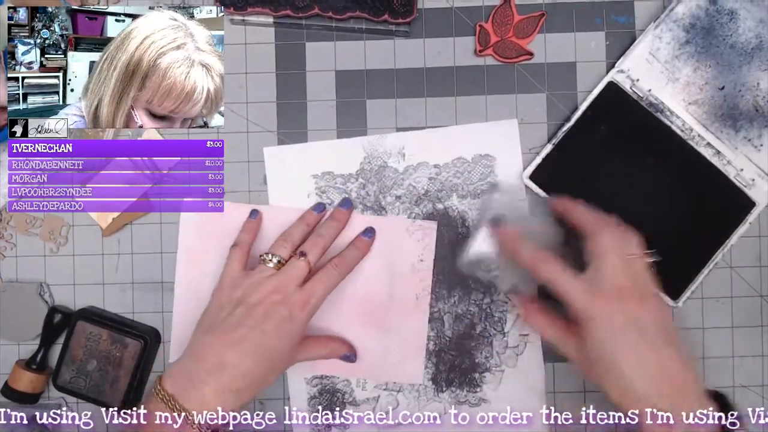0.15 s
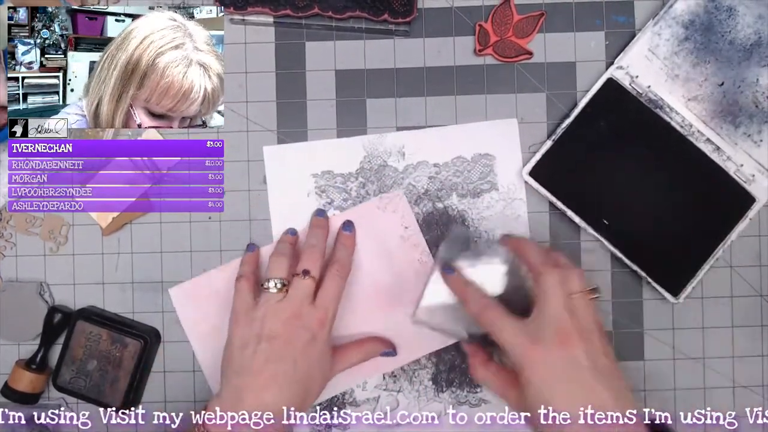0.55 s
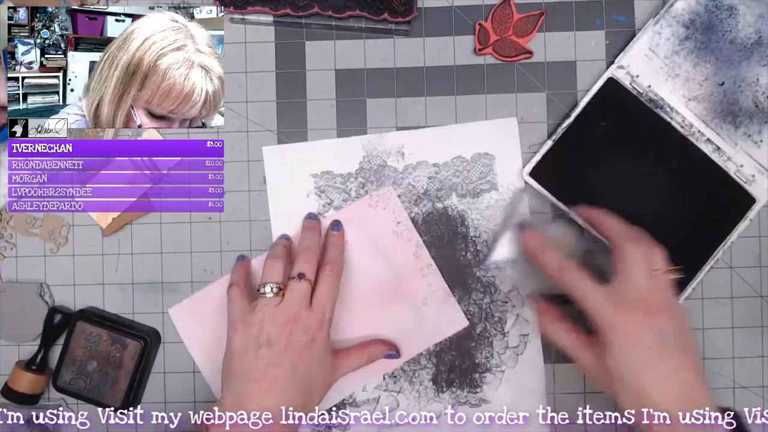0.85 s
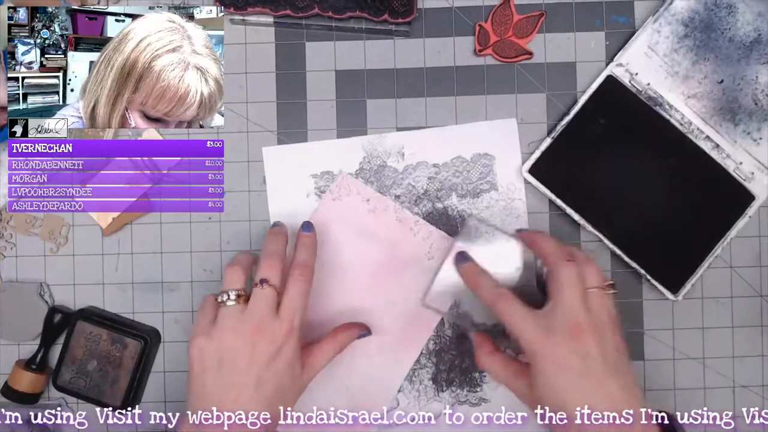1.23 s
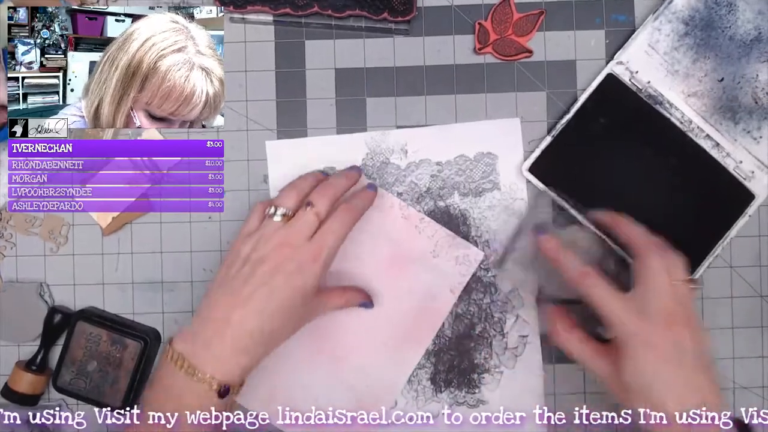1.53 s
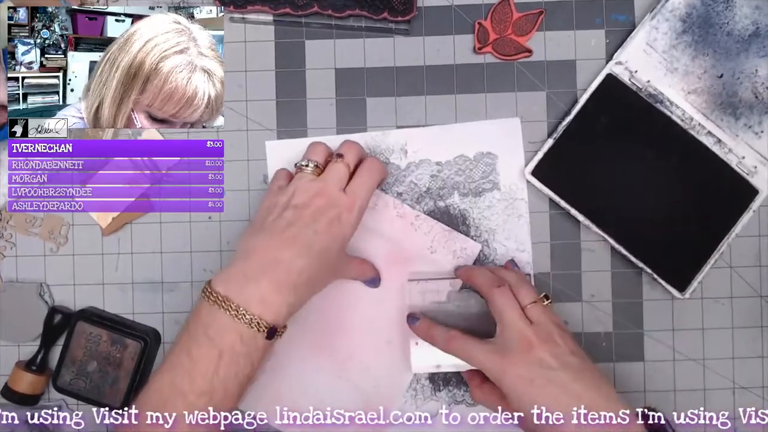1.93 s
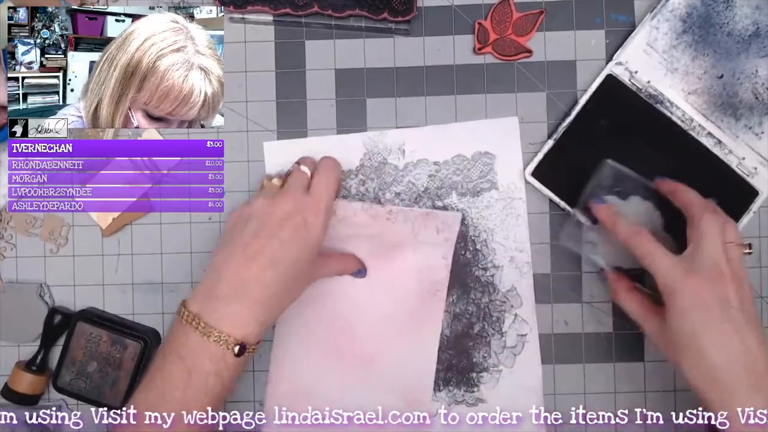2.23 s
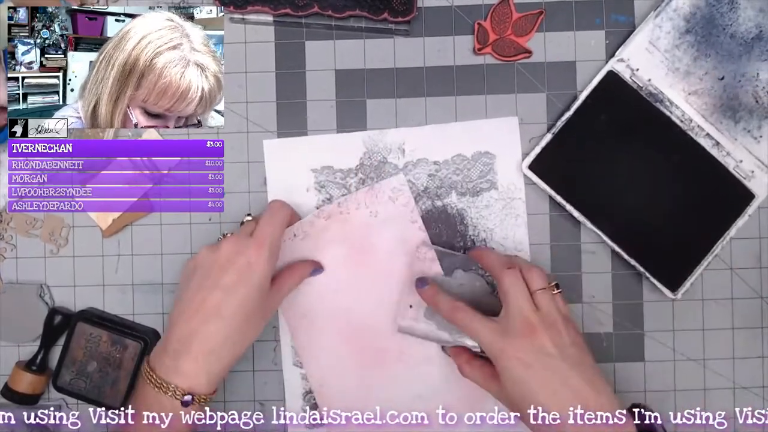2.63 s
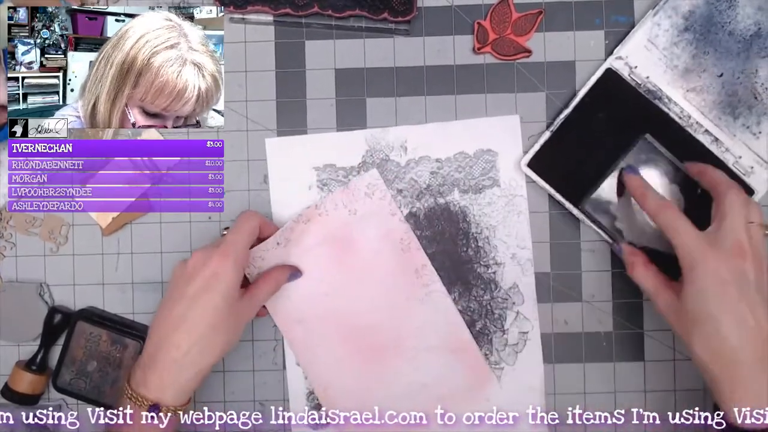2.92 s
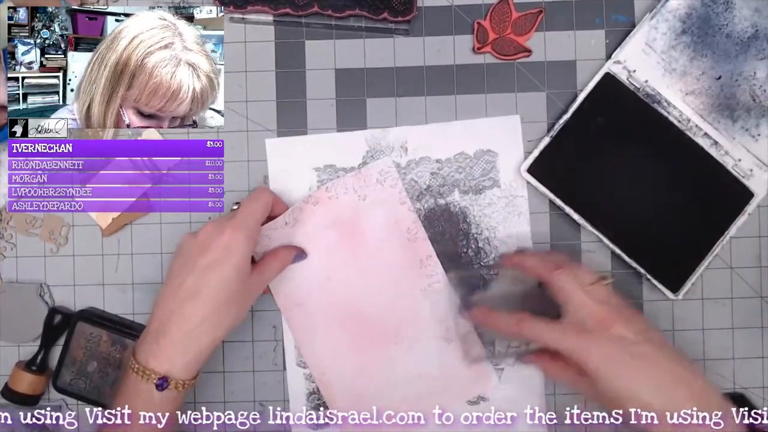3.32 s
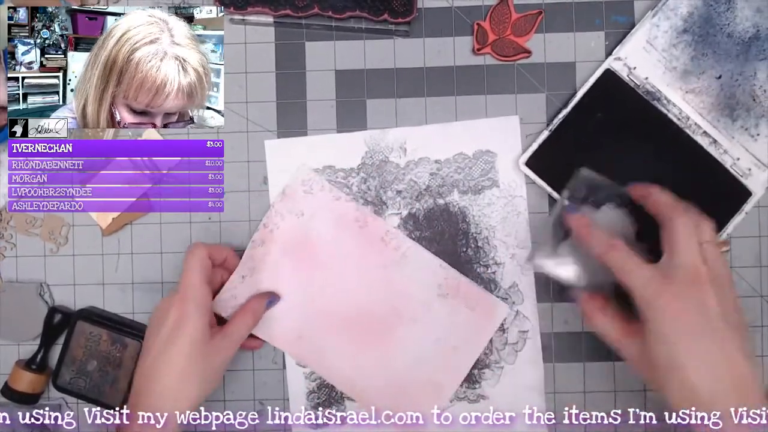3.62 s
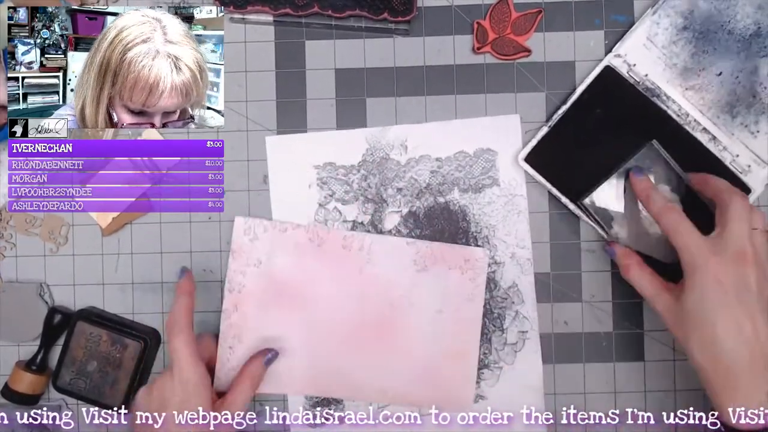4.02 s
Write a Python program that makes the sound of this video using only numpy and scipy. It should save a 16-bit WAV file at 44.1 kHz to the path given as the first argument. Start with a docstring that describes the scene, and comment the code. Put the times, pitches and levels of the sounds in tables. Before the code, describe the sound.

Quick, even clacks and thumps of a rubber stamp being inked and pressed onto paper, with soft paper hiss between them.

```python
"""Rubber stamp, ink pad and paper

A rubber stamp on an acrylic block goes back and forth between an ink pad and paper on a desk. Each impact
excites damped modes: the pad's plastic case clacks, the block clicks and the desk thumps. Tacky ink
crackles as its threads part, and friction makes the sheet hiss as it is slid round between blows.
The room is small and fairly dry."""
import sys
import numpy as np
from scipy import signal
from scipy.io import wavfile
from scipy.ndimage import uniform_filter1d

SR = 44100
rng = np.random.default_rng(int(sys.argv[2]) if len(sys.argv) > 2 else 0)


def unload_wav(signal):
    """Save mono or channel-first audio to the path in sys.argv[1] as 16-bit WAV at rate SR, clipped to [-1, 1]."""
    wavfile.write(
        sys.argv[1],
        SR,
        np.round(np.clip(np.atleast_2d(signal).T, -1, 1) * 32767).astype(np.int16),
    )


N = 183632
T = np.arange(SR * 3 // 5) / SR  # time axis of one impulse response, t/s

# blows on the pad: t/s, then level/dB of case, desk, click, block, after-knock
PAD_BLOWS = [(0.1712, -16, -27.5, -25.5, -32, -37), (0.8807, -19, -45, -27, -34.5, -71.5),
             (1.5637, -18.5, -25, -27, -30, -48.5), (2.1842, -19.5, -28, -25.5, -33.5, -62),
             (2.7919, -18.5, -31.5, -27, -37.5, -60), (3.3800, -17, -22.5, -26.5, -43, -48),
             (3.9371, -21, -29.5, -28, -41.5, -72)]
# blows on the paper: t/s, clatter/dB, desk/dB, desk tilt/(dB/octave), click/dB, block/dB,
# block tilt/(dB/octave), delay until flat/s, skid/dB, after-knock/dB, scrape/dB
PAPER_BLOWS = [(0.5495, -25.5, -19, 3, -30.5, -32, -1, 0.0037, -46.5, -37, -60.5),
               (1.224, -51, -24, 0.5, -27.5, -34.5, -1.5, .002, -40, -38, -54.5),
               (1.865, -28, -23.5, -0.5, -25.5, -32.5, -13.5, 0.009, -54, -37.5, -56),
               (2.4696, -21, -19, 1, -24.5, -27, -2.5, 0.0071, -34.5, -36, -47),
               (3.0739, -21, -17, 1.5, -23.5, -28, -2.5, 0.0087, -35, -32.5, -47.5),
               (3.667, -23.5, -18, 3.5, -24, -29.5, -2.5, 0.0079, -45, -45, -48.5)]
# peeling off the pad: t/s, first snap's ring/dB, its crack/dB, first gap/s, crackle/dB, crackle length/s
INK_PEELS = [(0.2492, -40.5, -43.5, .044, -50.5, .135), (0.9452, -44, -45, 0.032, -48.5, 0.058),
             (1.6403, -38.5, -41.5, .039, -51.5, 0.091), (2.2511, -40.5, -44.5, 0.024, -48.5, 0.065),
             (2.8654, -40.5, -44, 0.028, -50.5, 0.097), (3.4608, -40.5, -43.5, 0.059, -46, 0.15),
             (3.9990, -45.5, -52, 0.045, -53.5, .1)]
# slides of the sheet: t/s, length/s, level/dB, swell/(dB/s)
SHEET_SLIDES = [(-0.02, 0.069, -64.5, -1), (0.107, .31, -61, -17), (0.218, 0.092, -52.5, 9.5),
                (0.685, 0.0095, -50.5, 0), (0.761, 0.18, -54, 25), (0.887, 0.091, -45, -67),
                (1.348, 0.027, -51.5, -1), (1.581, 0.13, -55, 5), (1.941, 0.22, -54, 27),
                (2.151, 0.18, -42.5, -31), (2.52, 0.2, -50.5, -27), (2.821, 0.14, -50.5, -36),
                (3.202, 0.34, -52.5, 12.5), (3.773, 0.07, -50.5, -2), (3.969, 0.072, -53, -140)]
# flicks of the sheet: t/s, level/dB
SHEET_FLICKS = [(2.166, -35), (2.615, -44.5), (3.255, -54), (3.773, -47.5)]

# normal modes: f/Hz, relative level/dB, t60/s
DESK_MODES = [(118, -12, 0.017), (143, -7, 0.15), (243, -1, 0.062), (273.6, 1.5, 0.042), (291, 3.5, 0.073),
              (379, -7, 0.12), (480, -25, 0.047), (491.5, 0.5, .07), (529, 0.5, 0.097), (627, -14, 0.043),
              (704, -12.5, 0.14), (842.3, 0, 0.059)]
CASE_MODES = [(352, -18, 0.05), (433, -12.5, 0.07), (431, -12, .045), (565, -8.5, 0.067), (590, -3, 0.035),
              (697, -23.5, .04), (835.5, 2.5, 0.03), (875, 6, .05), (1053, -0.5, 0.029), (1121, 3.5, 0.038),
              (1207, -18.5, 0.09), (1560, -15.5, .02), (5638, -15.5, 0.041), (7470, -19, 0.012)]
BLOCK_MODES = [(2060, -4.5, 0.042), (2170, -9.5, 0.036), (2827, -3, 0.045), (3407, -3.5, 0.034),
               (3718, -4.5, 0.047), (3950, -6, 0.052), (4930, 3, 0.036), (5260, 2, 0.045),
               (5530, -5, 0.048), (6993, -1, 0.025), (8280, -15, 0.054)]
INK_MODES = [(930, -4, .032), (1050, -1, .032), (1135, 0, .032), (1225, -5, .03), (2030, -19, .016),
             (4200, -14, .012)]
DESK_HUM_MODE = [(980, 0, 0.3)]
LOW_HUM_MODE = [(214, 0, .3)]

# source spectra: f/Hz, relative level/dB
HUSH_SPECTRUM = [(25, -4), (70, -9.5), (130, 0), (250, -2), (500, -3), (950, -21.5), (1500, -14),
                 (4000, -21), (15000, -38)]
HISS_SPECTRUM = [(100, -36.5), (900, -22), (2000, -20), (3150, -18), (4100, -4.5), (4800, -2.5), (5250, 1),
                 (5900, -6.5), (7500, -9.5), (10000, -15), (13000, -22.5), (16000, -41.5)]
SQUEAK_SPECTRUM = [(1000, -38), (1800, -12), (2050, 5.5), (2350, -26), (3100, -8), (4500, -31)]
SCRAPE_SPECTRUM = [(60, -30), (170, -6), (232, -8), (320, -3), (520, 1.5), (820, -5.5), (950, 4.5),
                   (1080, -7.5), (1500, -11.5), (2500, -23), (6000, -53.5)]
SNAP_SPECTRUM = [(200, -29), (1000, -19.5), (2000, 2.5), (3000, -7), (4200, 5), (5300, -3), (7000, -7),
                 (9500, -5), (13000, -27), (16000, -54)]
KNOCK_SPECTRUM = [(50, -21), (130, 3.5), (350, 2.5), (800, -4), (1400, -15.5), (3000, -38.5), (8000, -72.5)]
CLICK_SPECTRUM = [(100, -35), (700, 5.5), (1400, -2), (2200, -2), (3100, -7.5), (4200, -4.5), (5100, -2),
                  (6300, -9), (8000, -12.5), (10000, -16), (13000, -26.5), (16000, -40.5)]
CLATTER_SPECTRUM = [(60, -46), (280, -21), (420, -11.5), (600, -5.5), (850, -2.5), (1180, -1), (1400, -19),
                    (2300, -20.5), (3500, -33.5), (8000, -63)]

# reverberation time of the room: f/Hz, t60/s
ROOM_DECAY = [(100, 0.1), (300, 0.06), (1000, 0.19), (3000, 0.18), (6000, 0.022), (14000, 0.99)]
# strength of the reverberation: f/Hz, level/dB
ROOM_LEVEL = [(100, -25.5), (300, -12), (900, -19.5), (2000, -12), (5000, -18), (12000, -26)]
# microphone response: f/Hz, gain/dB
MIC_RESPONSE = [(25, -28.5), (40, -20.5), (60, -14), (85, -15), (105, -4), (125, -1.5), (170, 0),
                (13500, -0.5), (16000, -2.5)]
# balance of the channels: f/Hz, left over right/dB
BALANCE = [(40, -5), (70, -10.5), (130, -9.5), (280, -5.6), (600, -3), (1200, -1.8), (2200, 2.2), (4000, 0)]

TICK_AFTER_S, TICK_DB = .001, -5.5  # the sharp tick within each click, relative to the click
KNOCK_AFTER_S = .072


def amp(db):
    """Amplitude ratio of a level in decibels."""
    return 10 ** (np.asarray(db) / 20)


def unit_rms(x):
    """Normalises the power of a steady signal to 1."""
    return x / np.sqrt(np.mean(x ** 2) + 1e-20)


def unit_blow(x):
    """Normalises the energy of a transient to that of 30 ms at an rms of 1."""
    return x / np.sqrt(np.sum(x ** 2) / (.03 * SR) + 1e-20)


def read(points, hz):
    """Interpolates a table on a log-frequency axis."""
    f, value = np.transpose(points)
    return np.interp(np.log(hz + 1), np.log(f), value)


def add(mix, s, sound):
    """Superposes a sound on the mix at time s."""
    part = mix[max(0, round(s * SR)):][:len(sound)]
    part += sound[:len(part)]


def colour(x, points, size=4096):
    """Minimum-phase filter: the phase follows from the log gain by the Hilbert transform."""
    log_gain = np.log(amp(read(points, abs(np.fft.fftfreq(size, 1 / SR)))))
    taps = np.fft.ifft(np.exp(np.conj(signal.hilbert(log_gain)))).real
    return signal.oaconvolve(x, taps[:size // 2])[:len(x)]


def ring(modes, detune, tilt_db=0):
    """Free vibration as a sum of damped modes, weighted anew as the point of impact varies."""
    hz, db, t60 = np.transpose(modes)[:, :, None]
    weight, shift = rng.standard_normal((2, len(modes), 1))
    envelopes = amp(db + weight + tilt_db * np.log2(hz / hz.min()) - 60 * T / t60)
    sines = envelopes * np.sin(2 * np.pi * hz * (1 + detune * shift) * T)
    # a body radiates little below its lowest mode
    radiation = signal.butter(2, .8 * hz.min(), "highpass", fs=SR, output="sos")
    return unit_blow(signal.sosfilt(radiation, sines.sum(0)))


def burst(spectrum, t60, tail_db, tail_t60):
    """Densely overlapping modes act as noise, here under the sum of two exponential decays."""
    fall = amp(-60 * T / t60) + amp(tail_db - 60 * T / tail_t60)
    return unit_blow(colour(rng.standard_normal(len(T)) * fall, spectrum))


def eased(x, rise_s):
    """A compliant contact spreads the force in time and softens the onset."""
    return unit_blow(x * (1 - np.exp(-T / rise_s)))


def stroke(start, length, rise_s, fall_db_per_s, swell_db_per_s=0):
    """Envelope of one movement: quadratic rise, steady swell or sag, exponential decay."""
    t = np.maximum(np.arange(N) / SR - start, 0)
    db = swell_db_per_s * np.minimum(t, length) - fall_db_per_s * np.maximum(t - length, 0)
    return np.minimum(t / rise_s, 1) ** 2 * amp(db)


def hush():
    """The room's background: stationary noise, strongest at low frequencies."""
    return amp(-74.5) * unit_rms(colour(rng.standard_normal(N), HUSH_SPECTRUM))


def room(x):
    """Diffuse reverberation: reflections build up over 3 ms and each band decays at its own rate."""
    hz, t, bands = signal.stft(rng.standard_normal(len(T)), SR, nperseg=256)
    t60 = read(ROOM_DECAY, hz)[:, None]
    bands *= amp(read(ROOM_LEVEL, hz)[:, None] - 60 * t / t60)
    bands *= np.sqrt(2 * np.log(1000) / (t60 * SR))  # offsets the greater energy of a longer decay
    tail = signal.istft(bands, SR, nperseg=256)[1][:len(T)] * np.clip(T / .003, 0, 1) ** 2
    return signal.oaconvolve(x, tail)[:N]


def low_hum():
    """Noise through a narrow resonance: a faint low hum that comes and goes once."""
    hum = unit_rms(signal.oaconvolve(rng.standard_normal(N), ring(LOW_HUM_MODE, detune=0))[:N])
    return amp(-58) * hum * stroke(start=1.31, length=.41, rise_s=.02, fall_db_per_s=160.5)


def friction(ticks_per_s=270, spread_db=1.5, tick_share=.48):
    """Stick-slip friction: fibres catch and snap free, giving an unsteady hiss with tiny ticks."""
    flutter = unit_rms(uniform_filter1d(rng.standard_normal(N), size=300))
    sizes = amp(spread_db * np.minimum(rng.exponential(1, N), 3))
    ticks = (rng.random(N) < ticks_per_s / SR) * rng.choice([-1, 1], N) * sizes
    return (rng.standard_normal(N) + tick_share * unit_rms(ticks)) * amp(1.4 * flutter)


def sheet(rise_s=.028, fall_db_per_s=429):
    """Sliding friction makes the sheet hiss, with a few flicks and one faint squeak."""
    rub = friction()
    sliding = sum(amp(db) * stroke(s, length, rise_s, fall_db_per_s, swell)
                  for s, length, db, swell in SHEET_SLIDES)
    out = sliding * unit_rms(colour(rub, HISS_SPECTRUM))
    squeak = unit_rms(colour(rub, SQUEAK_SPECTRUM))
    out += amp(-51.5) * squeak * stroke(3.855, .082, rise_s, fall_db_per_s)
    for s, db in SHEET_FLICKS:
        add(out, s, amp(db) * burst(HISS_SPECTRUM, t60=.011, tail_db=5.5, tail_t60=.21))
    return out


def scrapes(delay_s=.025, rise_s=.037, hold_s=.076, hum_db=-9.5):
    """Forced vibration: the block drags as it leaves the paper, and a desk resonance hums on."""
    rub, out = friction(), np.zeros(N)
    scrape = unit_rms(colour(rub, SCRAPE_SPECTRUM))
    hum = unit_rms(signal.oaconvolve(rub, ring(DESK_HUM_MODE, detune=0))[:N])
    for s, *_, db in PAPER_BLOWS:
        out += amp(db) * scrape * stroke(s + delay_s, rise_s + hold_s, rise_s, fall_db_per_s=154)
        out += amp(db + hum_db) * hum * stroke(s + delay_s, rise_s, rise_s, fall_db_per_s=30.5)
    return out


def tacky_ink(threads_per_s=170, pitches=16, snaps=3, gap_ratio=.94, step_db=-6.5):
    """Ink threads rupture under tension: a Poisson crackle and a few quickening, weakening snaps."""
    crackle, out = np.zeros(N), np.zeros(N)
    for _ in range(pitches):
        ruptures = (rng.random(N) < threads_per_s / pitches / SR).astype(float)
        pop = eased(ring(INK_MODES, detune=.045), rise_s=.002)[:2048]
        crackle += signal.oaconvolve(ruptures, pop)[:N]
    for s, ring_db, crack_db, gap_s, crackle_db, length in INK_PEELS:
        peel = stroke(s, length, rise_s=.015, fall_db_per_s=455.5, swell_db_per_s=-30)
        out += amp(crackle_db) * unit_rms(crackle) * peel
        for k in range(snaps):
            tone = eased(ring(INK_MODES, detune=.035), rise_s=.0015)
            crack = burst(SNAP_SPECTRUM, t60=.023, tail_db=-9.5, tail_t60=.13)
            add(out, s, amp(k * step_db) * (amp(ring_db) * tone + amp(crack_db) * crack))
            s += gap_s * gap_ratio ** k
    return out


def knock():
    """A heavily damped low-frequency transient: the dull knock that follows a blow."""
    return burst(KNOCK_SPECTRUM, t60=.031, tail_db=-3.5, tail_t60=.13)


def tick():
    """The instant of contact is an impulse, so its spectrum is broad."""
    return unit_blow(colour(signal.unit_impulse(len(T)), CLICK_SPECTRUM))


def pad_taps(chatter_s=.0024, chatter_db=-1.5):
    """Impact on the pad excites block, case and desk; the block chatters, touching again more softly."""
    out = np.zeros(N)
    for s, case_db, desk_db, click_db, block_db, knock_db in PAD_BLOWS:
        add(out, s, amp(case_db) * eased(ring(CASE_MODES, detune=.006), rise_s=.00066))
        add(out, s, amp(desk_db) * eased(ring(DESK_MODES, detune=.006), rise_s=.0023))
        add(out, s, amp(block_db) * eased(ring(BLOCK_MODES, detune=.006), rise_s=.0003))
        rattle = burst(CLATTER_SPECTRUM, t60=.031, tail_db=-18, tail_t60=.12)
        click = burst(CLICK_SPECTRUM, t60=.02, tail_db=-14, tail_t60=.14)
        add(out, s + chatter_s, amp(case_db - 2.5) * rattle)
        add(out, s, amp(click_db - 1.5) * eased(click, rise_s=.0015))
        add(out, s + TICK_AFTER_S, amp(click_db + TICK_DB) * tick())
        add(out, s + TICK_AFTER_S + chatter_s, amp(click_db + TICK_DB + chatter_db) * tick())
        add(out, s + KNOCK_AFTER_S, amp(knock_db) * knock())
    return out


def paper_stamps(skid_lead_s=.0063):
    """Oblique impact: one edge skids and strikes, exciting block and desk; then the face lands flat."""
    out = np.zeros(N)
    for (s, clatter_db, desk_db, desk_tilt, click_db, block_db, block_tilt,
         flat_s, skid_db, knock_db, _) in PAPER_BLOWS:
        desk = ring(DESK_MODES, detune=.006, tilt_db=desk_tilt)
        block = ring(BLOCK_MODES, detune=.01, tilt_db=block_tilt)
        skid = burst(CLICK_SPECTRUM, t60=.06, tail_db=-15, tail_t60=.17)
        click = burst(CLICK_SPECTRUM, t60=.026, tail_db=-15, tail_t60=.13)
        edge_clatter = burst(CLATTER_SPECTRUM, t60=.048, tail_db=-24, tail_t60=.046)
        face_clatter = burst(CLATTER_SPECTRUM, t60=.04, tail_db=-20, tail_t60=.19)
        add(out, s - skid_lead_s, amp(skid_db) * eased(skid, rise_s=.0012))
        add(out, s, amp(click_db) * eased(click, rise_s=.0012))
        add(out, s + TICK_AFTER_S, amp(click_db + TICK_DB) * tick())
        add(out, s, amp(desk_db) * eased(desk, rise_s=.0055))
        add(out, s, amp(block_db) * eased(block, rise_s=.000078))
        add(out, s, amp(clatter_db - 3.5) * edge_clatter)
        add(out, s + flat_s, amp(clatter_db - .5) * face_clatter)
        add(out, s + KNOCK_AFTER_S, amp(knock_db) * knock())
    return out


def scene():
    """Mid-side stereo: direct sound is central; only reverberation and hush spread sideways."""
    direct = pad_taps() + paper_stamps() + tacky_ink() + sheet() + scrapes() + low_hum()
    mid = direct + room(direct) + hush()
    side = colour(room(direct), [(80, -5), (300, -5), (1000, -34), (4000, -2.5), (8000, -20.5)])
    side += amp(-17) * hush()
    return np.array([mid + side, mid - side])


def record(dry, ceiling=.92, cutoff_hz=16200):
    """Filters thin the bass and lean it right; soft saturation rounds the peaks; a low-pass follows."""
    heard = np.array([colour(colour(x, MIC_RESPONSE), [(hz, sign * db / 2) for hz, db in BALANCE])
                      for x, sign in zip(dry, (1, -1))])
    rounded = heard / (1 + (heard / ceiling) ** 6) ** (1 / 6)
    lowpass = signal.firwin(511, cutoff_hz, window=("kaiser", 9), fs=SR)
    return signal.oaconvolve(rounded, lowpass[None], "same")


dry = scene()
out = record(dry)
unload_wav(out)
```